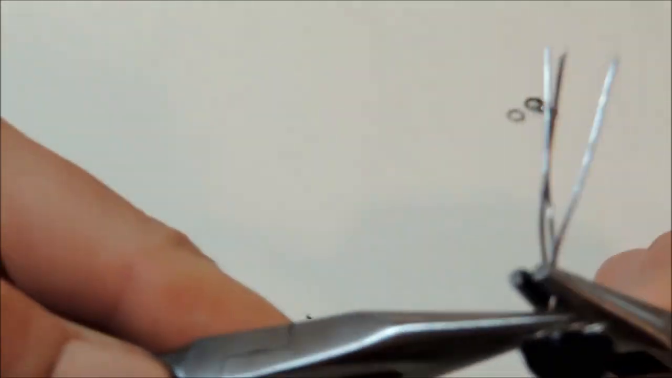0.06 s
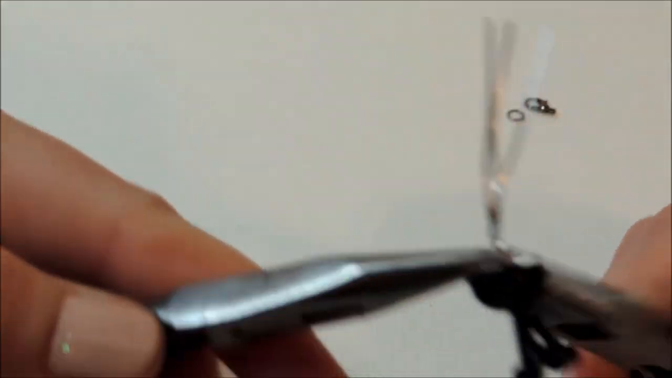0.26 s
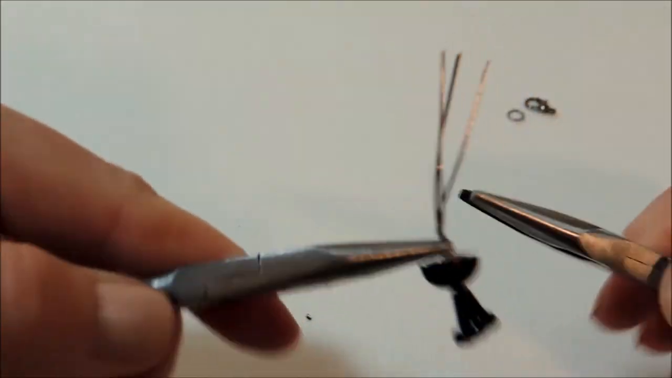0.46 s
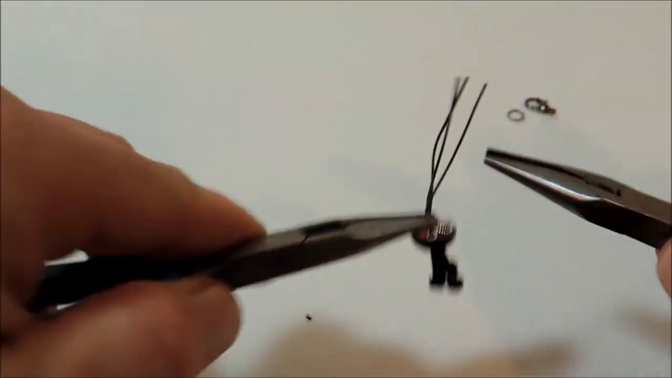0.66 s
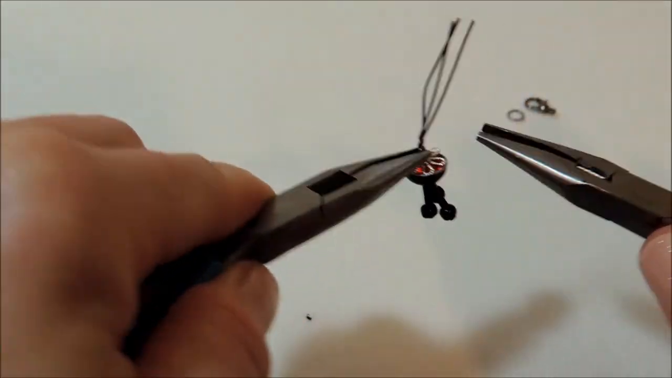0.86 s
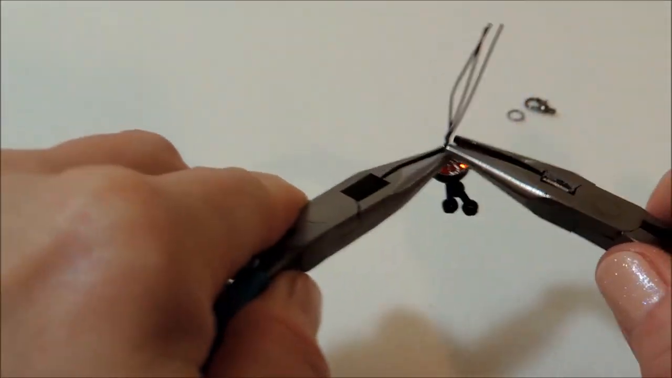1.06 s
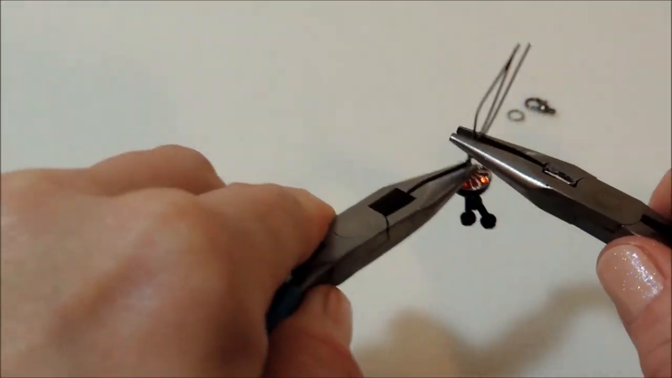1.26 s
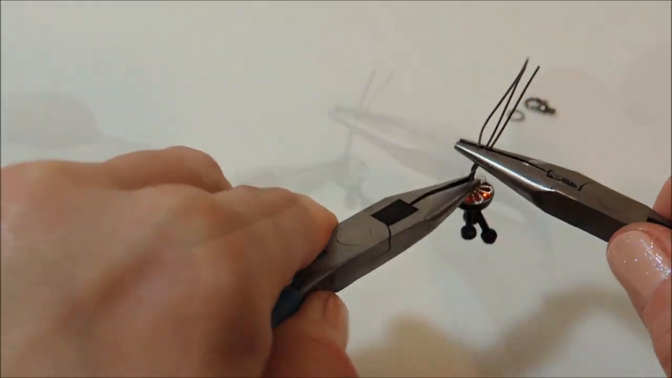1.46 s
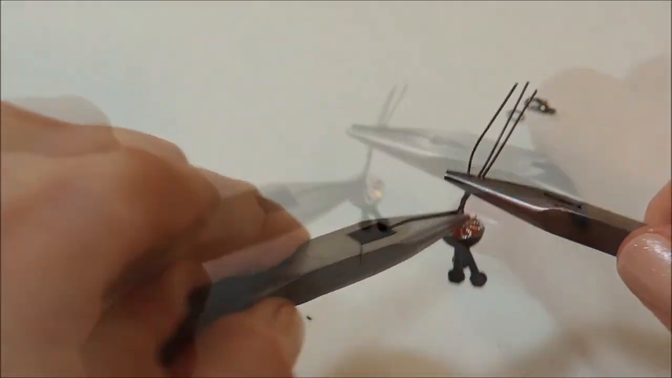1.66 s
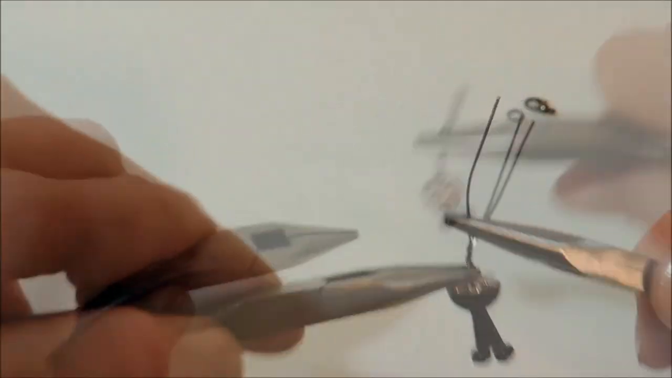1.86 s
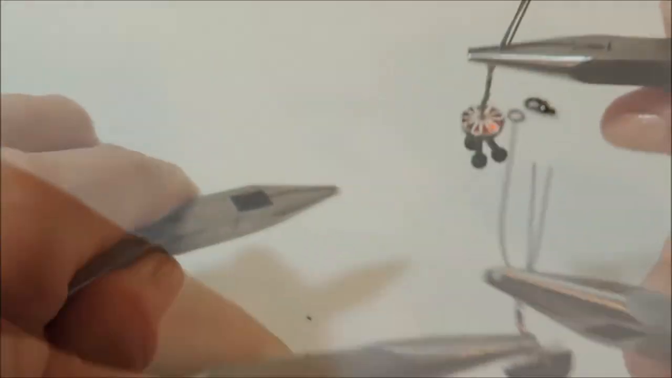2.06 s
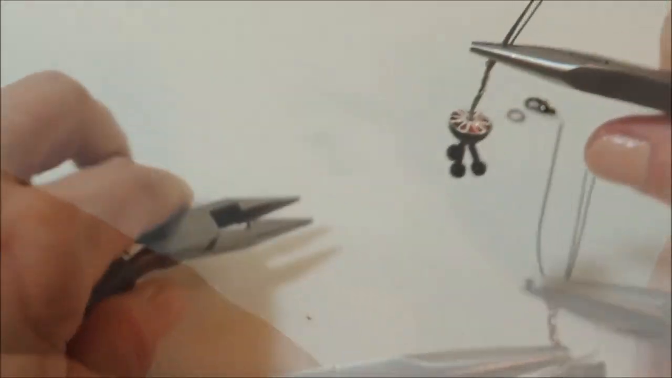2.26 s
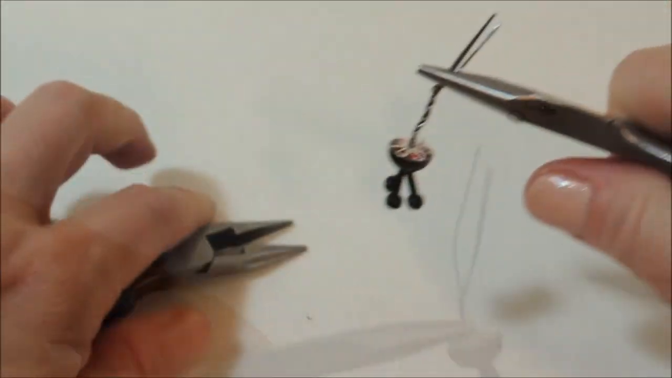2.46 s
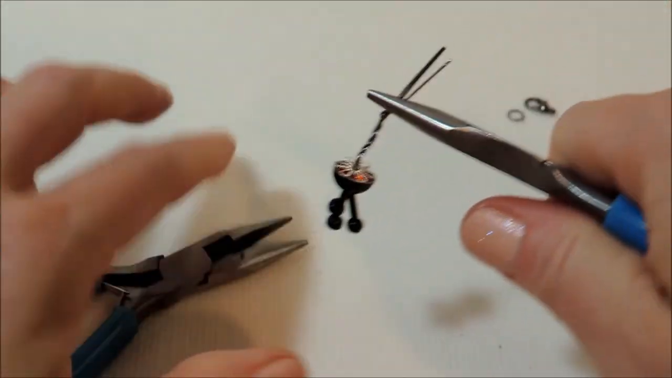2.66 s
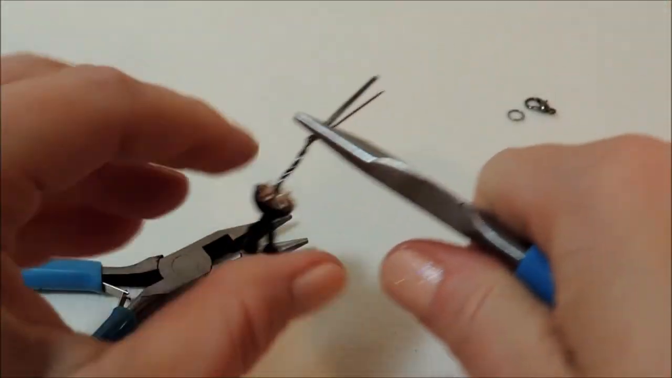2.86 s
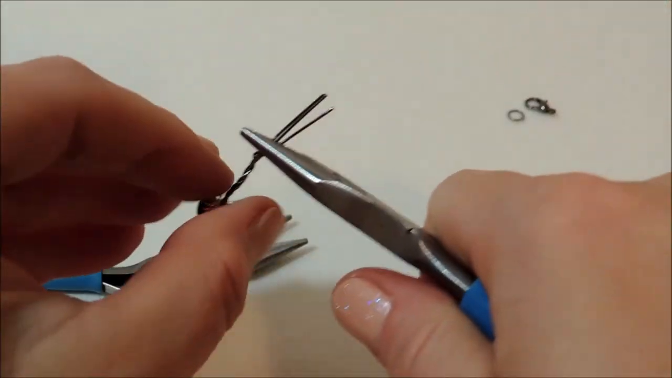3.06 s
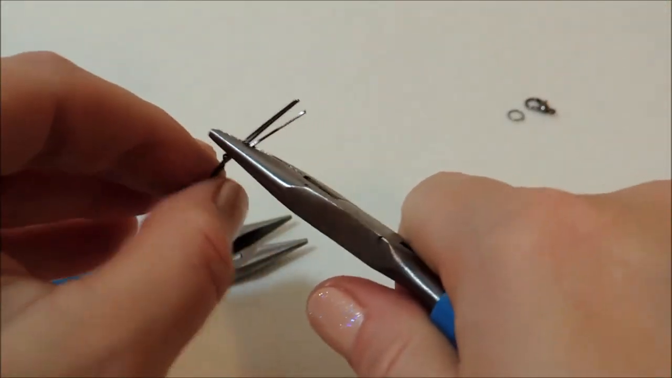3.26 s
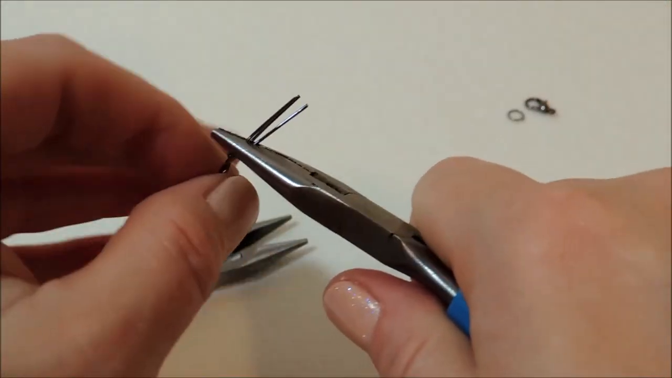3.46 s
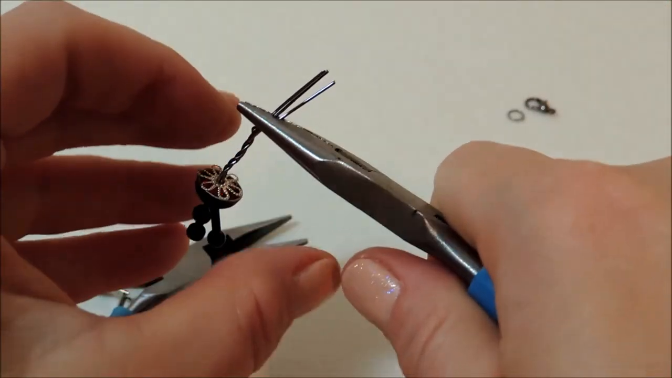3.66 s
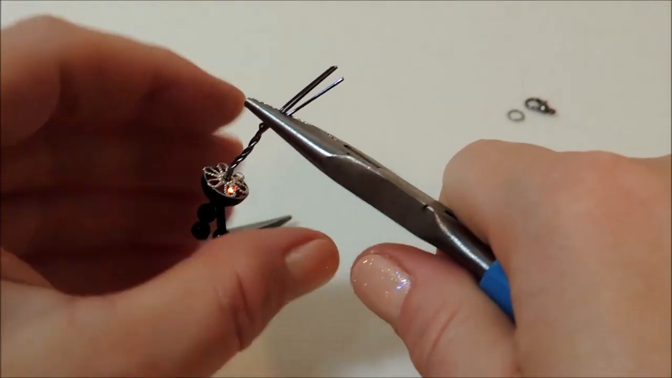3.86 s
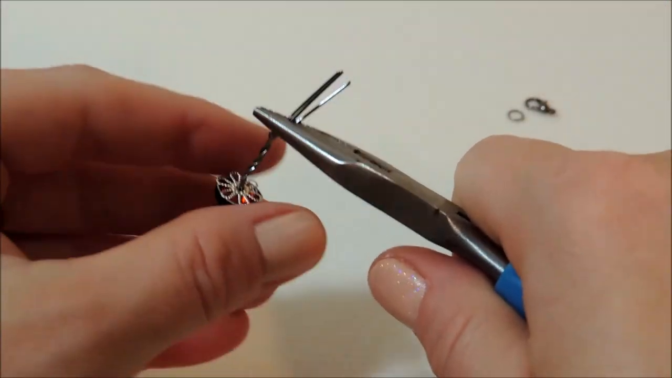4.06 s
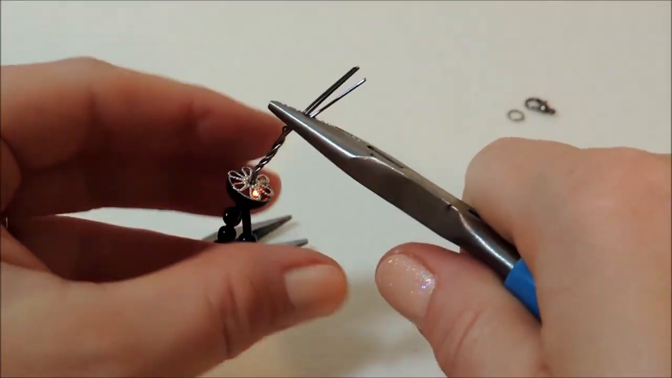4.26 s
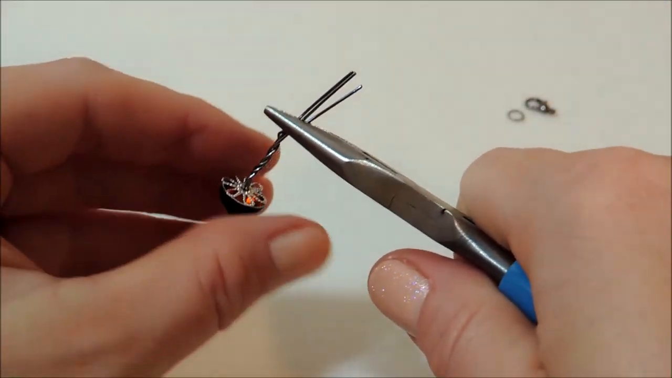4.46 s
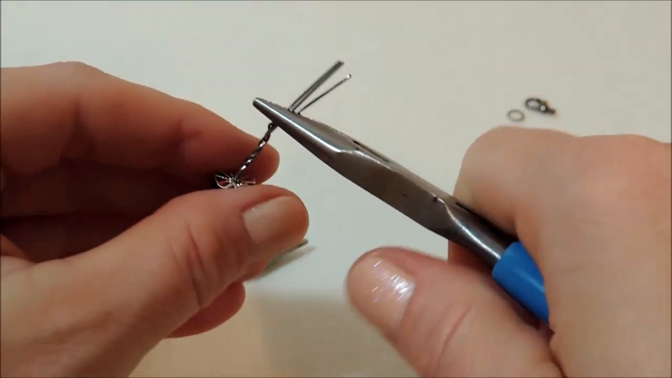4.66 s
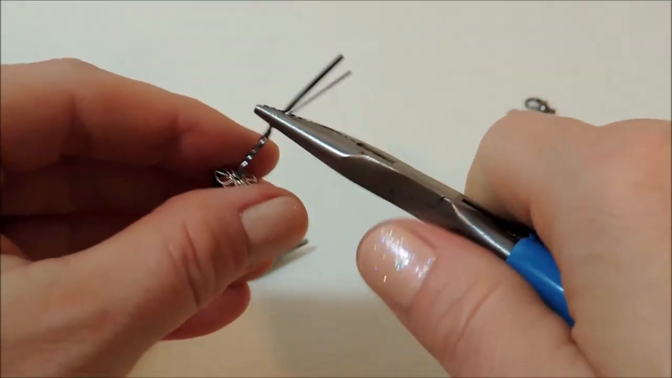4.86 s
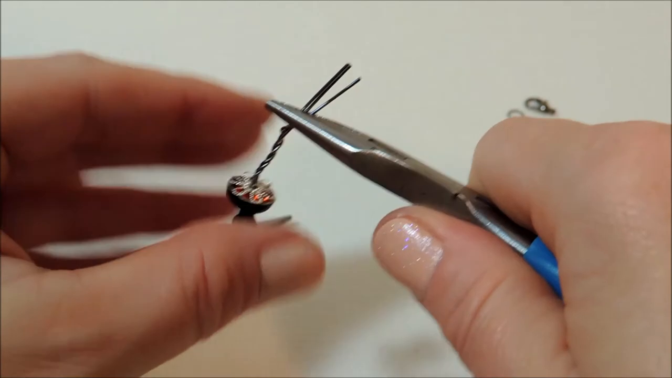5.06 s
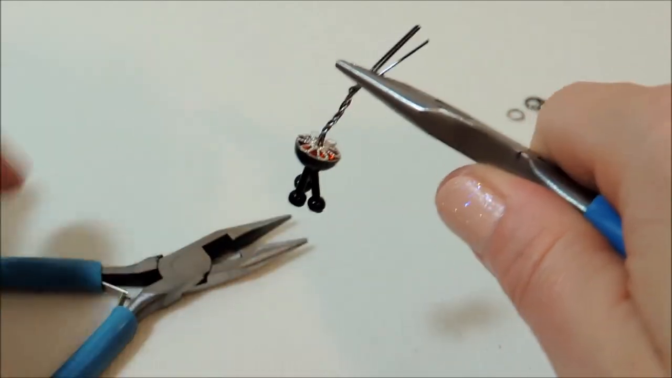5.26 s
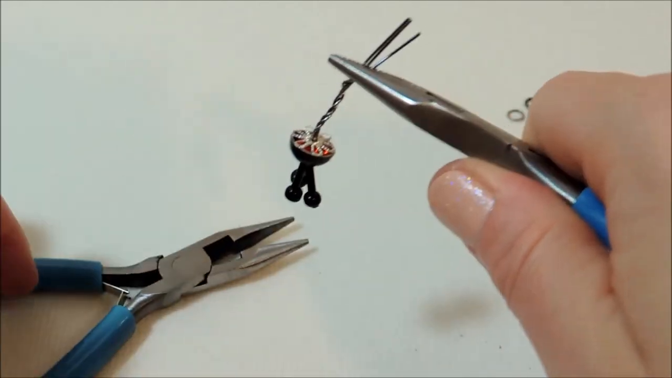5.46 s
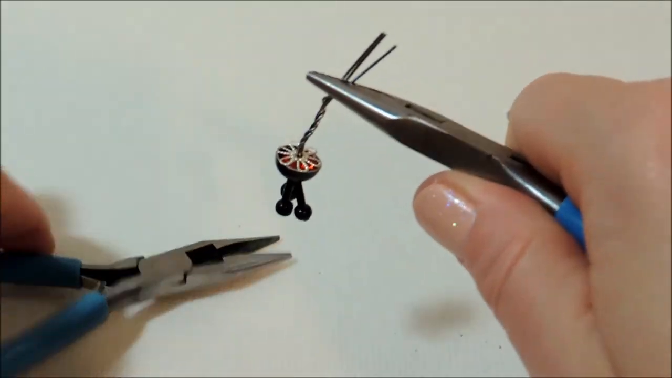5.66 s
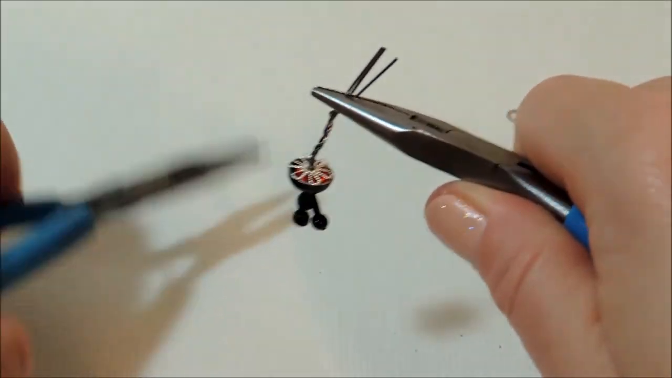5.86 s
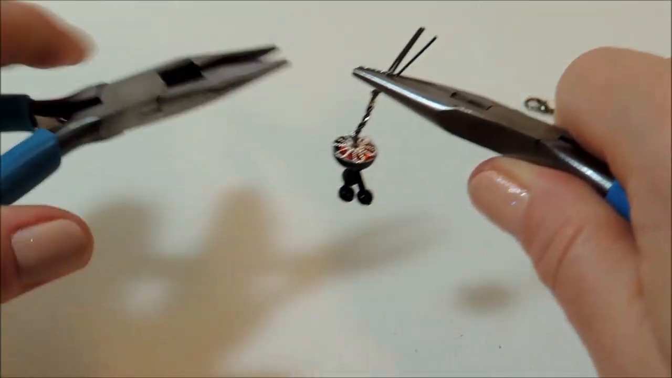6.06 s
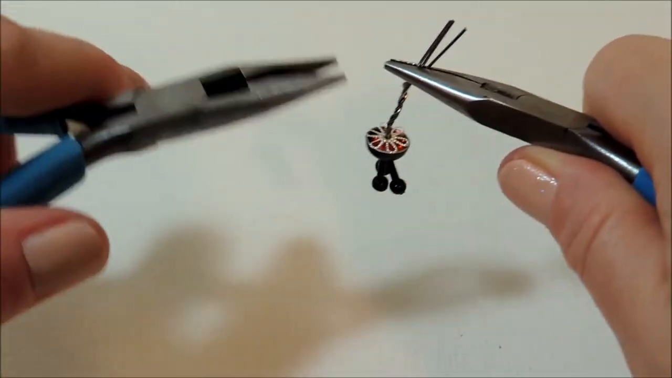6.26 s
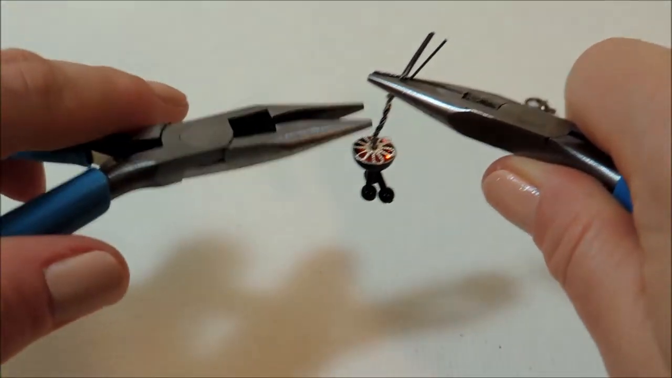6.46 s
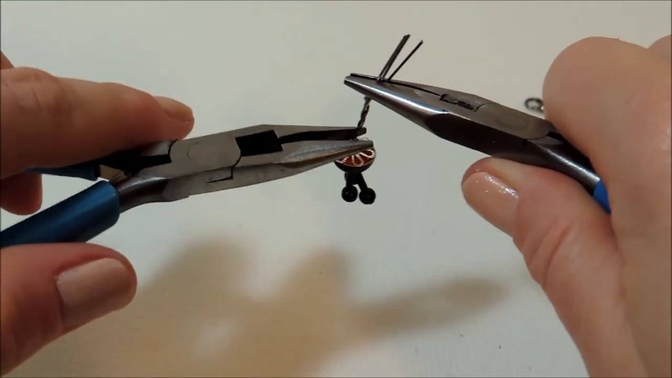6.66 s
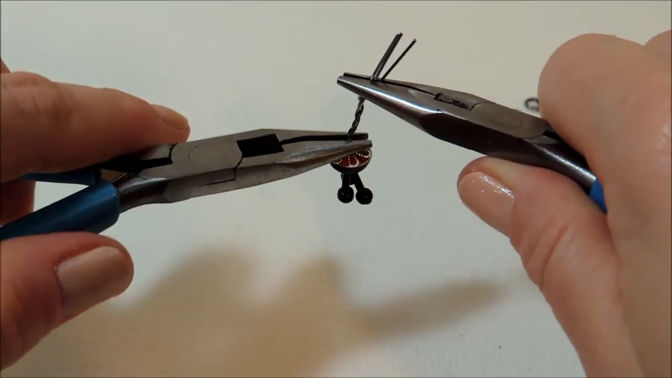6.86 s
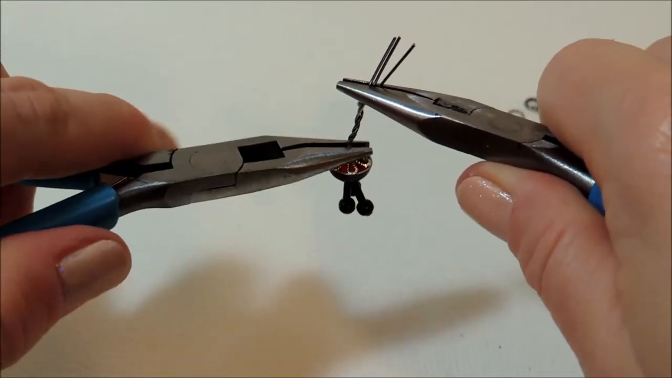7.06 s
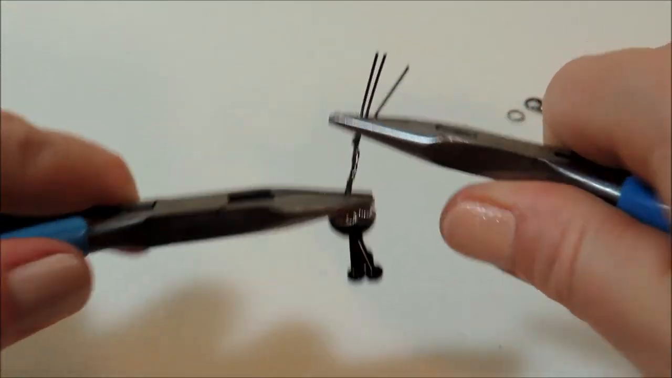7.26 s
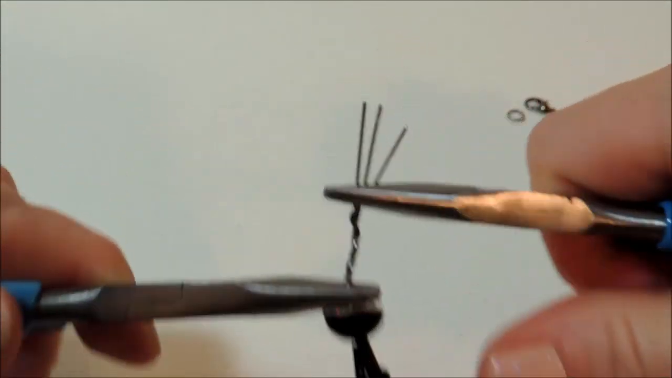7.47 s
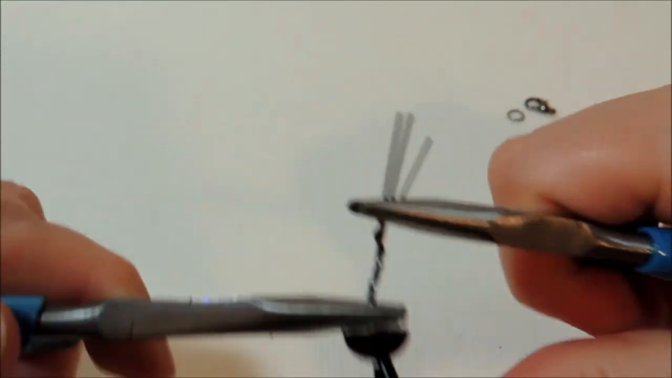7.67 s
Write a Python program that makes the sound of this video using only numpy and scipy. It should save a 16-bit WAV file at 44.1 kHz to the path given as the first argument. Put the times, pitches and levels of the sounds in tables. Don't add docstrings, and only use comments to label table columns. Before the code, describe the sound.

Small steel pliers tick faintly, then two sharp bright clacks with a quick bounce, later handle raps on a table, over low hum and hiss.

```python
import sys
import numpy as np
from scipy import signal
from scipy.fft import rfft, irfft, next_fast_len
from scipy.io import wavfile
from scipy.ndimage import map_coordinates

SR = 44100
rng = np.random.default_rng(int(sys.argv[2]) if len(sys.argv) > 2 else 0)


def dump_mix(stems):
    frames = np.atleast_2d(stems).T
    limited = np.clip(frames, -1, 1)
    pcm = np.round(limited * 32767).astype(np.int16)
    wavfile.write(sys.argv[1], SR, pcm)


def convert_level_to_amplitude(level_db):
    exponent = np.asarray(level_db, float) / 20
    return 10 ** exponent


N = 340011


def unit(x):
    return x / np.sqrt(np.mean(x ** 2) + 1e-20)


def along(points, hz):
    f, v = np.transpose(points)
    return np.interp(np.log(hz + 1), np.log(f + 1), v)


def wobble(rate):
    knots = rng.standard_normal(int(N * rate / SR) + 4)
    return map_coordinates(knots, [np.arange(N) * rate / SR])


def filtered(x, response):
    n = x.shape[-1]
    m = next_fast_len(n + 4096)
    return irfft(rfft(x, m) * response(np.fft.rfftfreq(m, 1 / SR)), m)[..., :n]


def noise(spectrum, alike):
    turn = lambda hz: np.arccos(np.clip(along(alike, hz), -1, 1)) / 2
    shape = lambda hz: convert_level_to_amplitude(along(spectrum, hz)) * [np.cos(turn(hz)), np.sin(turn(hz))]
    mid, side = filtered(rng.standard_normal((2, N)), shape)
    return unit(np.array([mid + side, mid - side]))


def add(track, s, sound):
    start = round(s * SR)
    part = track[:, start:start + sound.shape[1]]
    part += sound[:, :part.shape[1]]


# (start [s], end [s], fade in [s], fade out [s], share of a second background [0-1])
OVERLAPS = [
    (-.1, 0.104, .02, .02, .8),
    (1.416, 2.6, .12, 0.22, 1),
    (5.3, 5.7, .5, 0.5, 0.44),
]
# (frequency [Hz], level [dB per Hz])
AIR = [(12, -40), (20, -3.5), (66, -5), (90, -7), (150, -10.5), (570, -15.5), (1500, -28), (2000, -43),
       (3300, -120)]
# (frequency [Hz], level [dB per Hz])
HISS = [(350, -33), (600, -4.5), (633, -13), (659, -3.5), (1890, -3.5), (2130, -4.5), (13700, -12.5),
        (14400, -7.5), (15000, -70)]
# (frequency [Hz], likeness [0-1])
ALIKE = [(60, 0.77), (130, 0.63), (290, 0.056), (640, 0.26), (3000, 0)]


def background():
    t = np.arange(N) / SR
    both = sum(np.interp(t, [start - fade_in, start, end, end + fade_out], [0, share, share, 0])
               for start, end, fade_in, fade_out, share in OVERLAPS)
    phase = 2 * np.pi * np.cumsum(120 + 0.21 * wobble(5.2)) / SR
    hum_db = -61 + 6 * both + 1.1 * wobble(3.89)
    hum = convert_level_to_amplitude(hum_db) * (np.sin(phase) + convert_level_to_amplitude(-20) * np.sin(phase / 2))
    rumble_db = -59.5 + 3.5 * both + 0.24 * wobble(8)
    rumble = convert_level_to_amplitude(rumble_db) * noise(AIR, ALIKE)
    hiss = convert_level_to_amplitude(-61 + 4 * both) * noise(HISS, ALIKE)
    return hum + rumble + hiss


def strokes(rows):
    t = np.arange(N) / SR
    stroke_db = 15
    return sum(convert_level_to_amplitude(db - stroke_db * np.maximum((s - t) / rise, (t - s) / fall)) for s, db, rise, fall in rows)


# (loudest time [s], level [dB], rise [s], fall [s], dull part against the bright [dB])
SLIDES = [
    (0.096, -65, .07, .044, -1.5),
    (0.406, -58.5, 0.065, 0.027, -5),
    (0.456, -55, .02, .08, -5),
    (5.392, -52, .065, .06, 1.5),
    (5.736, -55, .05, .05, -1.5),
    (5.824, -50.5, .04, .06, -3),
    (5.884, -48, .04, .03, -7),
]
# (frequency [Hz], level [dB per Hz])
GRIT = [(180, -16), (300, -1), (763, -3.5), (1350, -5.5), (1880, -6), (11200, -4), (14000, -4),
        (15000, -41)]


def slides():
    table_top_hz = 4200
    grit = unit(convert_level_to_amplitude(2.1 * wobble(300)) * noise(GRIT, [(1000, 0.73), (6000, 0.089)]))
    dull = filtered(grit, lambda hz: 1 / (1 + (hz / table_top_hz) ** 4))
    steel = strokes([row[:-1] for row in SLIDES]) * (grit - dull)
    wood = strokes([(s, db + dull_db, rise, fall) for s, db, rise, fall, dull_db in SLIDES]) * dull
    return steel + wood


# (frequency [Hz], time to fade by 60 dB [s])
WALLS = [(100, 0.28), (500, 0.51), (2000, 0.44), (6000, 0.35), (14000, 0.35)]


def tail(sound):
    hz, t, z = signal.stft(rng.standard_normal((2, SR // 3)), SR, nperseg=256)
    mono = np.clip(along(ALIKE, hz) + 0.2, 0, 1)[:, None]
    z[1] = mono * z[0] + np.sqrt(1 - mono ** 2) * z[1]
    fade = convert_level_to_amplitude(-60 * t / along(WALLS, hz)[:, None])
    answer = signal.istft(z * fade, SR, nperseg=256)[1]
    answer *= np.clip(np.arange(answer.shape[1]) / SR / 0.0023, 0, 1)
    answer *= convert_level_to_amplitude(1.9 * np.repeat(rng.standard_normal(answer.shape[1] // 64), 64))
    return signal.fftconvolve(sound, convert_level_to_amplitude(-6) * answer / np.linalg.norm(answer[0]), axes=1)


ECHO_S = 0.0085


def struck(modes, length, tilt_db, scatter_db, alike, widen, low_hz, high_hz, room_db):
    u = np.arange(SR // 16) / SR / max(length, 1e-4)
    turn = np.arccos(np.clip(alike, -1, 1)) / 2
    mid, side = rng.standard_normal((2, 2, len(u))) * [[[np.cos(turn)]], [[np.sin(turn)]]]
    push = u ** .45 * np.exp(-2.4 * u) * np.array([mid + side, mid - side])
    gains = [convert_level_to_amplitude(db + tilt_db * np.log2(c / modes[0][0]) + rng.normal(0, scatter_db)) for c, w, db in modes]
    gains = gains * (-1) ** np.arange(len(modes))

    def band(f):
        bass_cut = (1j * f / (low_hz + 1j * f)) ** 2
        return bass_cut / (1 - (f / high_hz) ** 2 + 1.3j * f / high_hz) ** 2

    def peaks(f, k):
        return band(f) * np.array([g * 1j * f * k * w / (c * c - f * f + 1j * f * k * w)
                                   for g, (c, w, db) in zip(gains, modes)])

    rings = filtered(push, lambda f: peaks(f, widen).sum(axis=0))
    rings /= np.abs(rings[:, 0].mean(axis=0)).max()
    around = filtered(np.eye(1, len(u), SR // 500), lambda f: np.linalg.norm(peaks(f, 0.97 * widen), axis=0))
    around *= np.linalg.norm(rings[0, 0]) / np.linalg.norm(around)
    sound = convert_level_to_amplitude(room_db) * tail(around)
    add(sound, 0, rings[:, 0])
    add(sound, ECHO_S, convert_level_to_amplitude(-12) * rings[:, 1])
    return sound


# (time [s], peak level [dB], brightness [dB per octave], contact length [s], resonance of
# the touched spot [Hz])
TICKS = [(0.3152, -46, 9, 0.0036, 12000), (0.407, -42, -8, 0.0036, 12400), (1.244, -52, 6, 0.0033, 9890),
         (1.3528, -51, 3, 0.003, 9280), (1.6227, -37, -0.5, 0.0087, 11200), (2.47, -43.5, -5, 0.003, 6700),
         (2.497, -44.5, 2, 0.003, 12200), (2.637, -44, -7, 0.0034, 9960), (4.668, -51.5, 2, 0.0035, 9050),
         (5.0828, -49, 10, 0.003, 12600), (5.409, -46, -10, 0.003, 5300), (5.509, -40, -7, 0.0062, 7660),
         (5.5812, -36, -3, 0.0028, 4070), (5.803, -46, -9, 0.0021, 6100), (5.961, -42, -9, 0.0073, 6140),
         (5.975, -42, 0.1, 0.003, 12400), (6.964, -42.5, 8, 0.0051, 12800)]
# (time [s], peak level [dB], left against right [dB], contact
# length [s], resonance of the touched spot [Hz])
BLOWS = [
    (1.9062, -12.5, -2, 0.0036, 13150),
    (2.6648, -9.5, -2, 0.0025, 7300),
    (2.717, -22.5, -5, 0.0022, 7120),
    (2.7506, -24.5, 13, 0.0044, 12600),
    (2.775, -28.5, -11.5, 0.0034, 11300),
]
# (frequency [Hz], width [Hz], level [dB])
STEEL = [(3050, 620, -17), (4180, 700, -11), (5660, 370, -5.5), (6400, 280, -1), (7280, 520, 1),
         (8400, 640, 0.5), (10060, 950, 1), (11940, 460, 3.5), (12600, 250, 6.5), (14550, 1250, -3.5)]


def jaws():
    track = np.zeros((2, N))
    tick_pan_db, blow_tilt_db = -2.2, -5.5
    light = [(s, db, tilt_db, length, tick_pan_db, hz) for s, db, tilt_db, length, hz in TICKS]
    hard = [(s, db, blow_tilt_db, length, pan_db, hz) for s, db, pan_db, length, hz in BLOWS]
    for s, db, tilt_db, length, pan_db, hz in sorted(light + hard):
        tick = struck(STEEL + [(hz, 200, -1.5)], length, tilt_db, scatter_db=0.0, alike=-0.15, widen=1.97,
                      low_hz=1980, high_hz=19100, room_db=-0.7)
        add(track, s - .0003, convert_level_to_amplitude(db + np.array([[.5], [-.5]]) * pan_db) * tick)
    return track


# (time [s], peak level [dB], hardness [dB per octave])
THUMPS = [(1.906, -41, 7), (1.385, -53.5, 4), (1.624, -49.5, 22), (2.095, -47, 1), (2.4736, -35, -7),
          (2.663, -18.5, 2.5), (2.674, -32.5, 6), (2.714, -32.5, -7), (2.75, -26.5, -6), (3.471, -54, -4),
          (5.447, -39, 7), (5.491, -44.5, -2.5), (5.683, -45, 1), (5.573, -36.5, 3), (5.963, -39, -10),
          (1.244, -52, 9)]
# (frequency [Hz], level [dB], time to fade by 60 dB [s])
TABLE = [(125, 2, 0.067), (238.4, 1.5, 0.052), (314, -1, 0.048), (382, -1, 0.032), (468, -7, 0.02),
         (564, -20.5, 0.027), (710, -20, 0.04)]


def table():
    track = np.zeros((2, N))
    t = np.arange(SR // 5) / SR
    for s, db, hard_db in THUMPS:
        ring = sum(convert_level_to_amplitude(level + hard_db * np.log2(hz / 119) - 60 * t / t60) * np.sin(2 * np.pi * hz * t)
                   for hz, level, t60 in TABLE)
        rise_s = 0.0012 * convert_level_to_amplitude(-.4 * hard_db)
        ring = ring * (1 - np.exp(-t / rise_s)) ** 2
        ring = filtered(ring, lambda f: (1j * f / (85 + 1j * f)) ** 2)
        ring = convert_level_to_amplitude(db + np.array([[.8], [-.8]])) * ring / np.abs(ring).max()
        add(track, s, ring)
        add(track, s, convert_level_to_amplitude(-3.0) * tail(ring))
    return track


# (time [s], peak level [dB], brightness [dB per octave], contact length [s], loudest resonance [Hz])
KNOCKS = [
    (1.623, -50, 12, 0.0071, 624),
    (1.905, -29.5, -3, 0.0051, 1300),
    (2.095, -42.5, -5.5, 0.006, 920),
    (2.665, -28, -5, 0.0046, 950),
    (2.751, -31, -3, 0.0039, 3030),
    (5.964, -41, -3, 0.0031, 1620),
]
# (frequency [Hz], width [Hz], level [dB])
HANDLE = [(635, 100, -6), (1076, 374, -3), (1570, 160, -0.5), (2070, 115, -1), (2487, 73, 1), (2704, 84, 1),
          (3000, 350, -4), (3500, 410, -14), (3800, 300, -38), (5000, 960, -22)]


def handles():
    track = np.zeros((2, N))
    for s, db, tilt_db, length, hz in KNOCKS:
        knock = struck(HANDLE + [(hz, 120, 3)], length, tilt_db, scatter_db=2.0, alike=0.65, widen=2.04,
                       low_hz=298, high_hz=5900, room_db=0.9)
        add(track, s - .0013, convert_level_to_amplitude(db) * knock)
    return track


# (time [s], peak level [dB])
RAPS = [
    (5.448, -20.5),
    (5.5722, -20.5),
    (5.684, -36),
]
# (frequency [Hz], width [Hz], level [dB], left against right [dB])
GRIP = [(580, 60, -7, 5), (710, 60, -8, 4), (890, 90, -7, 3), (1090, 90, -4, 4), (1300, 120, -4, -1.5),
        (1600, 120, -1.5, 3), (1850, 160, -5, 1.5), (2070, 90, -3, -1.5), (2350, 150, 1.5, -4),
        (2730, 100, -1.5, 1.5), (2960, 140, 1.5, -4), (3460, 130, -5, -3), (4050, 150, -14, 1.5),
        (5100, 900, -21, -1.5)]


def raps():
    track = np.zeros((2, N))
    rebound_s, rebound_db = .0021, -3
    for s, db in RAPS:
        push = np.zeros((1, SR // 16))
        push[0, [0, round(rebound_s * SR)]] = 1, -convert_level_to_amplitude(rebound_db)
        vary_db = rng.normal(0, 1.2, len(GRIP))

        def modes(f, widen):
            peaks = []
            for k, (c, w, level, pan_db) in enumerate(GRIP):
                gain = (-1) ** k * convert_level_to_amplitude(level + vary_db[k] + np.array([[.5], [-.5]]) * pan_db)
                peaks.append(gain * 1j * f * w / (c * c - f * f + 1j * f * widen * w))
            return np.array(peaks)

        coat = lambda f: 1 / (1 - (f / 6000) ** 2 + 1.3j * f / 6000)
        ring = filtered(push, lambda f: modes(f, widen=1.05).sum(axis=0) * coat(f))
        ring = convert_level_to_amplitude(db) * ring / np.abs(ring.mean(axis=0)).max()
        all_sides = lambda f: np.linalg.norm(modes(f, widen=2.5) * coat(1.6 * f), axis=(0, 1))
        around = filtered(np.eye(1, SR // 16, SR // 500), all_sides)
        around *= np.linalg.norm(ring[0]) / np.linalg.norm(around)
        add(track, s, convert_level_to_amplitude(1.5) * tail(around))
        add(track, s, ring)
        add(track, s + ECHO_S, convert_level_to_amplitude(-11) * ring[::-1])
    return track


# (loudest time [s], level [dB], rise [s], fall [s])
SLEEVE = [
    (6.398, -58, 0.081, 0.19),
    (7.378, -62.5, .03, 0.34),
]
# (frequency [Hz], level [dB per Hz])
CLOTH = [(500, -25), (1100, -6), (2000, -3), (3200, -9), (5000, -24), (8000, -120)]


def sleeve():
    return strokes(SLEEVE) * noise(CLOTH, [(1000, 0.42)])


def scene():
    return background() + slides() + jaws() + table() + handles() + raps() + sleeve()


def top_cut(x):
    return signal.sosfilt(signal.butter(12, 15430, fs=SR, output="sos"), x)


def record(dry):
    top_hz = 14060
    limited = filtered(dry, lambda hz: convert_level_to_amplitude(-np.clip(0.04 * (hz - top_hz), 0, 90)))
    return top_cut(limited)


dry = scene()
out = record(dry)
dump_mix(out)
```